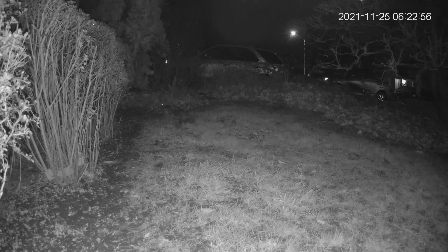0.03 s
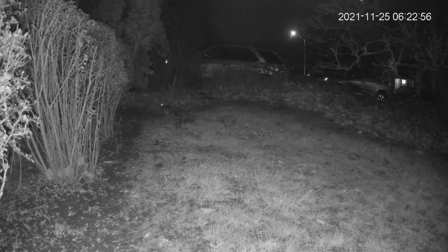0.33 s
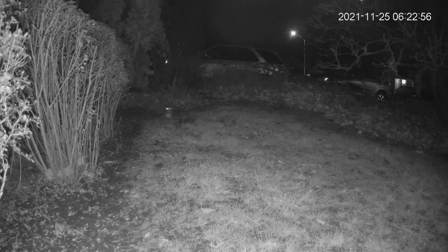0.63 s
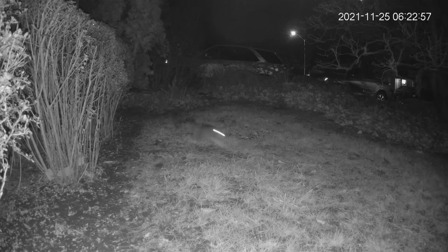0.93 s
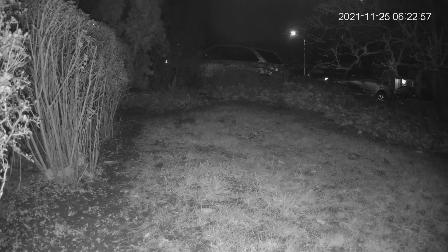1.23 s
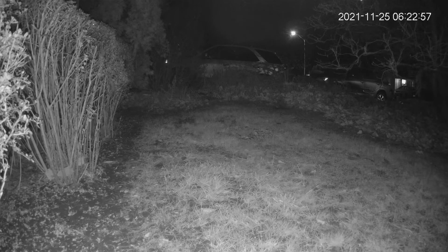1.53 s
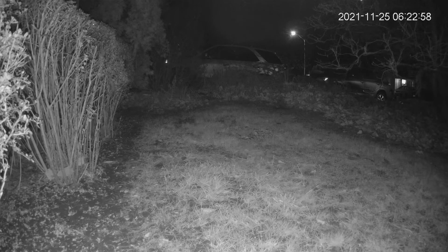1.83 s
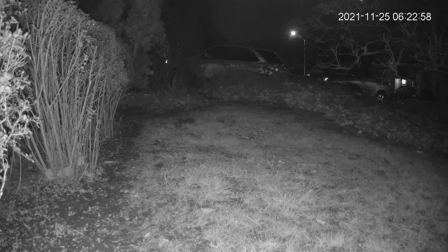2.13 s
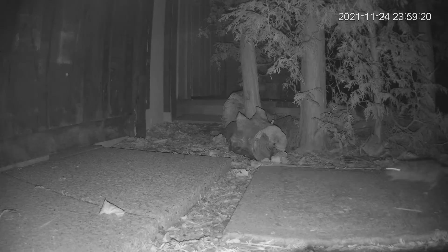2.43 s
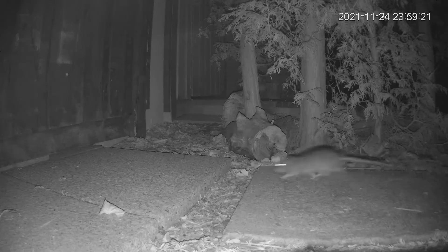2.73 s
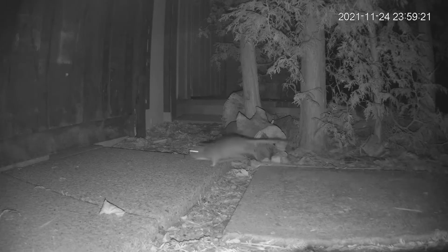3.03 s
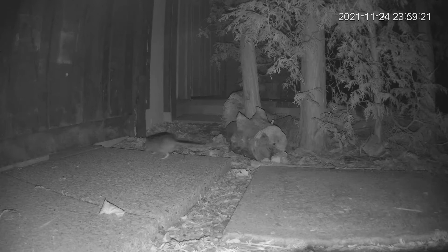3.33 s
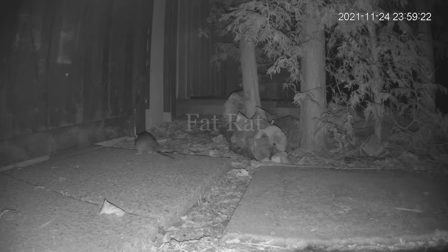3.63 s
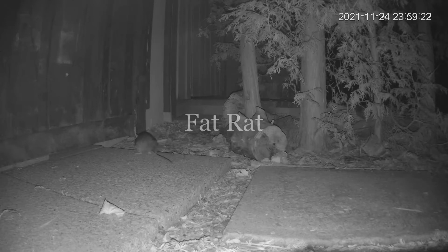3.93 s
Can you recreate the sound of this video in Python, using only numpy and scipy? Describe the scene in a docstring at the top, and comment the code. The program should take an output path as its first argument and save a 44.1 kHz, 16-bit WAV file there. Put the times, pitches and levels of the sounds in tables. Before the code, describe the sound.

A rat bounds past close to an outdoor microphone, rustling grass and dry leaves with tiny snaps and soft thuds. Behind it is a faint distant rumble, which then gives way to a quieter hum of air and hiss.

```python
"""A lawn at night, heard from a small outdoor camera's microphone, with a distant rumble and wash.
A rat bounds past close by. Each landing crushes grass and dry leaves into clumps of tiny crackles;
the nearest ones snap stalks and thud on the soil. Far off, tyres sing briefly.
The air then drops out for an instant and gives way to a quieter yard: low rumble, fine hiss,
faint scratches, and a faint low flutter that is probably the camera's electronics."""
import sys
import numpy as np
from scipy import signal
from scipy.io import wavfile
from scipy.ndimage import uniform_filter1d

SR = 44100
rng = np.random.default_rng(int(sys.argv[2]) if len(sys.argv) > 2 else 0)


def wrap_up_sound(samples):
    """Save the sound to the file named by the first command line argument, as 16-bit audio."""
    columns = np.atleast_2d(samples).T
    # keep every value between -1 and 1, then stretch to whole-number steps
    tamed = np.clip(columns, -1, 1)
    steps = np.round(tamed * 32767).astype(np.int16)
    wavfile.write(sys.argv[1], SR, steps)


N = 176400
T = np.arange(N) / SR


def amp(db):
    """Decibels to gain."""
    return 10 ** (np.asarray(db) / 20)


def unit(x):
    """Scales to rms 1."""
    return x / np.sqrt(np.mean(x ** 2) + 1e-20)


def add(mix, start_s, sound):
    """Mixes a sound in at the given time."""
    part = mix[round(start_s * SR):][:len(sound)]
    part += sound[:len(part)]


def fade(seconds, length_s=0.046):
    """Smooth opening that starts at zero seconds."""
    return np.sin(np.pi / 2 * np.clip(seconds / length_s, 0, 1)) ** 2


def level_at(spectrum, hz):
    """Reads a spectrum's level in dB on a log-frequency axis."""
    points_hz, db = np.transpose(spectrum)
    return np.interp(np.log(hz + 1), np.log(points_hz + 1), db)


def colour(x, spectrum):
    """Minimum-phase filter with the given spectrum."""
    hz = abs(np.fft.fftfreq(2048, 1 / SR))
    log_gain = np.log(amp(level_at(spectrum, hz)))
    taps = np.fft.ifft(np.exp(np.conj(signal.hilbert(log_gain)))).real
    return signal.fftconvolve(x, taps[:len(taps) // 2])[:len(x)]


def band_limit(x, edge_hz=7300):
    """Steep low-pass at the edge of the microphone's range."""
    return signal.fftconvolve(x, signal.firwin(601, edge_hz, window=("kaiser", 8), fs=SR), "same")


def resonate(x, hz, width_hz):
    """A resonance of gain 1 at a fixed or moving pitch."""
    turn = np.exp(2j * np.pi * np.cumsum(hz * np.ones(len(x))) / SR)
    pole = np.exp(-np.pi * width_hz / SR)
    return 2 * (turn * signal.lfilter([1 - pole], [1, -pole], x / turn)).real


def noise_band(n, hz, width_hz):
    """Noise narrowed around a pitch by two resonances."""
    return unit(resonate(resonate(rng.standard_normal(n), hz, width_hz), hz, width_hz))


def reflections(x, t60):
    """A tail of sparse reflections of random sign."""
    t = T[:SR // 2]
    taps = rng.standard_normal(len(t)) * (rng.random(len(t)) < .08) * amp(-60 * t / t60)
    return signal.fftconvolve(x, taps / np.linalg.norm(taps))[:len(x)]


def air(spectrum, patchy_db, flicker_db):
    """Open-air noise with drifting patches and a slight flicker shared by all frequencies."""
    hz = np.fft.rfftfreq(2048, 1 / SR)
    real, imag, drift = rng.standard_normal((3, N // 512 + 5, len(hz)))
    patches = unit(uniform_filter1d(uniform_filter1d(drift, size=8, axis=0), size=4, axis=1))
    flicker = unit(uniform_filter1d(rng.standard_normal(len(real)), size=8))[:, None]
    frames = (real + 1j * imag) * amp(level_at(spectrum, hz) + patchy_db * patches + flicker_db * flicker)
    return unit(signal.istft(frames.T, nperseg=2048, noverlap=1536)[1][:N])


def knocks(rows, puff_db=-7, puff_width=0.35):
    """Damped rings with a dull puff around their pitch; each swells and dies away."""
    out, t = np.zeros(N), T[:SR // 4]
    for start_s, db, hz, swell_s in rows:
        puff = amp(puff_db) * noise_band(len(t), hz, hz * puff_width)
        envelope = t / swell_s * np.exp(1 - t / swell_s)
        add(out, start_s, amp(db) * envelope * (np.sin(2 * np.pi * hz * t) + puff))
    return out


# Distant rumble and wash across the lawn: (frequency [Hz], relative level per Hz [dB])
LAWN_SPECTRUM = [(12, -25.5), (20, -1.5), (43, 0), (148, -5.5), (200, -14.5), (240, -12.5), (320, -16.5),
                 (449, -21), (550, -17.5), (635, -22), (681, -15), (730, -18), (988, -18), (1970, -38),
                 (3150, -44), (3570, -49), (5560, -50.5), (6140, -47), (7300, -57.5), (9490, -94.5)]
# Its slow swell at the microphone: (time [s], relative level [dB])
LAWN_LEVELS = [(0, 0), (.3, -0.5), (.65, -2), (1, 0), (1.4, 2), (1.7, -1.5), (2.1, -1.5), (2.35, -0.5)]


def lawn_air(db=-47.5):
    """Far-off rumble and wash, gently rising and falling."""
    swell_db = np.interp(T, *np.transpose(LAWN_LEVELS))
    return amp(db + swell_db) * air(LAWN_SPECTRUM, patchy_db=3.0, flicker_db=0.93)


def tyre_whine(peak_s=2.235, half_s=.06, db=-58.5, hz=1000, glide_hz_per_s=-600):
    """Tyres sing in the distant traffic: a brief, fuzzy, sinking tone."""
    pitch = hz + glide_hz_per_s * np.clip(T - peak_s, -2 * half_s, 2 * half_s)
    envelope = np.exp(-((T - peak_s) / half_s) ** 2)
    return amp(db) * envelope * noise_band(N, pitch, width_hz=90)


# Background of the quieter yard: (frequency [Hz], relative level per Hz [dB])
YARD_SPECTRUM = [(12, -42), (20, -3.5), (59, -0.5), (84, -6), (107, -14), (204, -12.5), (267, -15.5),
                 (342, -25), (700, -29.5), (772, -32.5), (895, -33), (1540, -41.5), (2400, -42.5),
                 (3230, -38), (4570, -49), (5750, -44), (6300, -49.5), (7300, -52.5), (9490, -83)]


def yard_air(db=-53.5):
    """A low rumble under a fine hiss."""
    return amp(db) * air(YARD_SPECTRUM, patchy_db=3.5, flicker_db=0.92)


def low_flutter(start_s=2.459, period_s=.1095, db=-49, hz=57.4, swell_s=0.0084):
    """A faint low flutter, about nine uneven pulses a second, probably the camera's electronics."""
    times = np.arange(start_s, T[-1], period_s)
    return knocks([(s, db + rng.uniform(-4, 8.2), hz, swell_s) for s in times])


# Soft thuds and low bumps near the microphone: (time [s], level [dB], pitch [Hz], swell [s])
SOIL_THUDS = [(.25, -42, 58.4, 0.011), (.55, -40.5, 65, 0.0047), (.72, -48.5, 245, 0.0089),
              (.8, -48, 308, .014), (.952, -49, 290, 0.0077), (1.015, -45.5, 44.8, 0.014),
              (1.13, -37, 35, 0.012), (1.222, -45, 394, 0.0079), (1.25, -41, 131, 0.0049),
              (1.293, -39.5, 55.3, 0.0076), (1.375, -42, 45.7, .01), (1.398, -42, 139, 0.0089),
              (1.408, -48.5, 233, 0.02), (1.785, -51, 354, 0.012), (2.28, -38, 52.8, 0.013),
              (2.742, -54.5, 227, 0.013)]


def soil_thuds():
    """The nearest landings thud on the soil, among other low bumps."""
    return knocks(SOIL_THUDS)


# Stalks breaking close to the microphone: (time [s], level [dB], pitch [Hz], ring [s])
STALK_SNAPS = [(0.8149, -37, 3300, .0006), (.947, -34.5, 5500, 0.00043), (0.955, -41.5, 2880, 0.00053),
               (1.0476, -33.5, 6000, 0.00075), (1.0527, -21, 5810, 0.00069), (1.0707, -30.5, 3230, 0.0016),
               (1.0796, -28.5, 2980, 0.0016), (1.08, -28.5, 6160, 0.00029), (1.0868, -37, 6150, 0.00074),
               (1.094, -29, 5450, 0.00045), (1.128, -36, 3440, 0.0011), (1.132, -30, 3450, 0.00077),
               (1.136, -29, 6570, 0.00085), (1.149, -35, 5730, 0.00046), (1.244, -40, 3180, 0.00029),
               (1.2477, -43, 2540, .0006), (1.3105, -45.5, 3300, 0.0006), (2.3243, -51.5, 5700, 0.00073)]


def stalk_snaps(crack_db=-13):
    """A stalk breaks with a tiny crack and rings for a few cycles."""
    out = np.zeros(N)
    for start_s, db, hz, ring_s in STALK_SNAPS:
        t = np.maximum(T - start_s, 0)
        envelope = (1 - np.exp(-t * hz)) * np.exp(-t / ring_s)
        crack = amp(crack_db) * rng.standard_normal(N)
        out += amp(db) * envelope * (np.sin(2 * np.pi * hz * t) + crack)
    return out


# Grass and dry leaves at close range: (frequency [Hz], relative level per Hz [dB])
LEAF_SPECTRUM = [(300, -8), (1000, -18), (1700, -11), (2400, -7.5), (3000, -1.5), (3750, -3.5),
                 (4400, -11.5), (5000, -8), (5700, -1.5), (6700, -1.5), (7400, -11.5)]


def crushed_leaves(n, leaf_hz, crackles_per_s=1600, spread_db=3, clump_db=2, clump_s=0.009):
    """Clumps of tiny crackles and a swish ring the leaf underfoot, with short reflections around it."""
    clumps = unit(signal.lfilter([1], [1, -np.exp(-1 / (clump_s * SR))], rng.standard_normal(n)))
    sizes = amp(spread_db * np.minimum(rng.exponential(1, n), 3) + clump_db * np.tanh(clumps))
    crackles = unit(sizes * rng.choice([-1, 1], n) * (rng.random(n) < crackles_per_s / SR))
    swish = rng.standard_normal(n)
    grains = colour(np.sqrt(0.55) * crackles + np.sqrt(0.45) * swish, LEAF_SPECTRUM)  # shares of power
    grains = grains + amp(0.5) * resonate(grains, leaf_hz, width_hz=330)
    return unit(band_limit(grains + amp(-4) * reflections(grains, t60=0.02487)))


# The rat's landings and scratches, passing the microphone:
# (peak time [s], level [dB], rise [s], fall [s], treble tilt [dB], leaf pitch [Hz])
FOOTFALLS = [(.565, -62, 0.018, 0.027, -4, 3280), (0.656, -65.5, .003, 0.0044, -22, 2400),
             (0.669, -60.5, 0.0078, .007, -13, 3000), (0.683, -61, 0.0072, 0.031, -4, 3270),
             (.765, -66, 0.035, 0.04, -8, 3300), (.8, -55, 0.012, .008, -4.5, 3150),
             (.812, -55, 0.0077, 0.013, -6, 3170), (.843, -57.5, .014, 0.019, -5, 3300),
             (0.918, -55.5, 0.011, 0.035, -1, 3020), (.954, -49.5, .01, 0.012, -5, 2950),
             (1.076, -45, 0.022, 0.033, 6.5, 3140), (1.136, -41.5, .014, 0.014, 1.5, 3480),
             (1.175, -58, .012, 0.0092, 0, 3200), (1.229, -55, 0.012, 0.0067, 4.5, 2800),
             (1.245, -50.5, 0.01, 0.012, -5, 3750), (1.301, -57, 0.017, 0.022, -2, 3200),
             (1.361, -70.5, 0.031, 0.041, 10.5, 3400), (1.412, -63.5, 0.018, .03, 8, 3620),
             (1.503, -70.5, 0.013, 0.033, 11, 3380), (1.595, -72.5, .012, 0.021, 8, 3400),
             (1.85, -79.5, 0.062, .03, 0.5, 3200), (2.329, -67.5, 0.0071, 0.0098, 0.5, 3300),
             (2.701, -76, .012, 0.011, -3, 3150), (2.846, -74.5, 0.0076, 0.0073, -6, 3950),
             (3.865, -82, 0.015, 0.011, 11, 3320)]


def footfalls(treble_hz=4070):
    """Each footfall crushes leaves in a rustle that swells and dies, with its own brightness."""
    out, t = np.zeros(N), np.arange(-.12, .2, 1 / SR)
    low_pass = signal.butter(4, treble_hz, fs=SR, output="sos")
    for peak_s, db, rise_s, fall_s, tilt_db, leaf_hz in FOOTFALLS:
        leaves = crushed_leaves(len(t), leaf_hz)
        dull = signal.sosfiltfilt(low_pass, leaves)
        rustle = dull * amp(-tilt_db / 2) + (leaves - dull) * amp(tilt_db / 2)
        envelope = np.exp(-np.where(t < 0, (t / rise_s) ** 2, t / fall_s))
        add(out, peak_s + t[0], amp(db) * envelope * rustle)
    return out


def scene(lawn_end_s=2.395, yard_start_s=2.398, wall_delay_s=.00515):
    """The rat on the lawn, then the quiet yard."""
    rat = footfalls() + stalk_snaps()
    wall = amp(-8.5) * np.roll(rat, round(wall_delay_s * SR))  # one close reflection
    echo = amp(-36) * reflections(rat, t60=0.12)
    lawn = (lawn_air() + tyre_whine()) * fade(lawn_end_s - T)
    quiet = (yard_air() + low_flutter()) * fade(T - yard_start_s)
    return (lawn + quiet + soil_thuds() + rat + wall + echo)[None]


def record(dry):
    """The outdoor camera's narrow-band mono microphone."""
    return band_limit(dry[0])[None]


dry = scene()
out = record(dry)
wrap_up_sound(out)
```